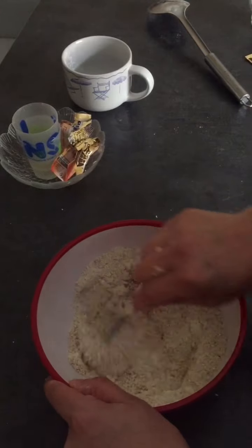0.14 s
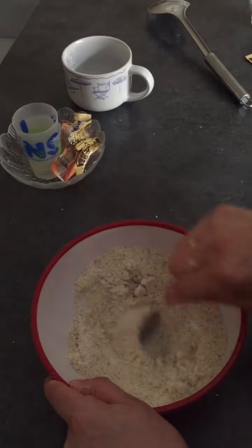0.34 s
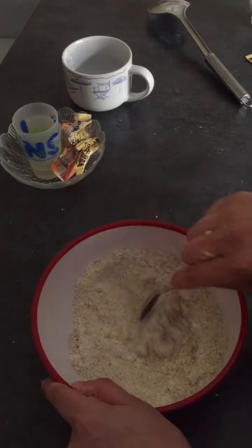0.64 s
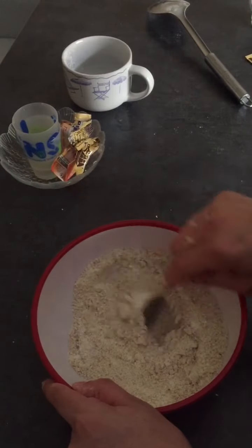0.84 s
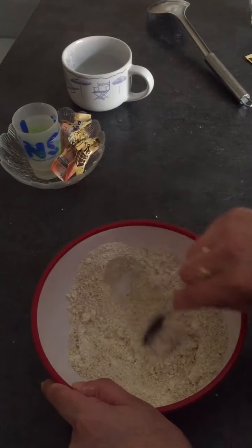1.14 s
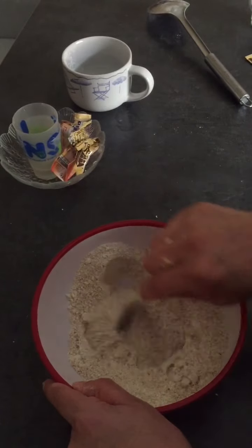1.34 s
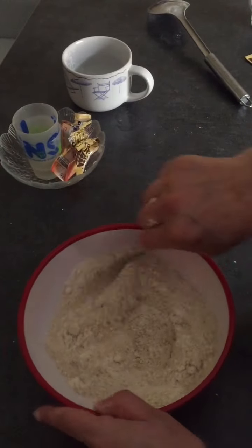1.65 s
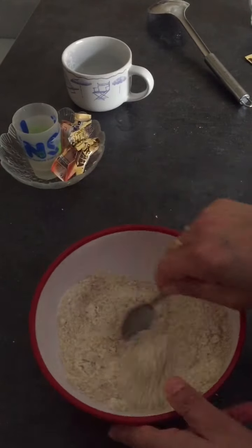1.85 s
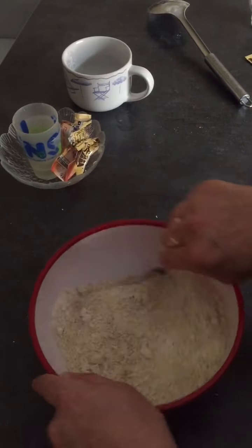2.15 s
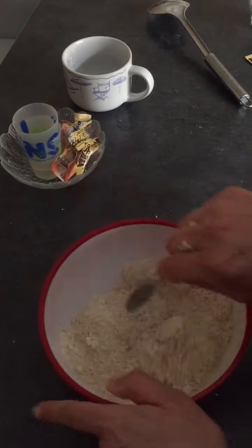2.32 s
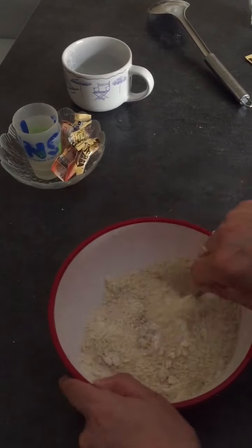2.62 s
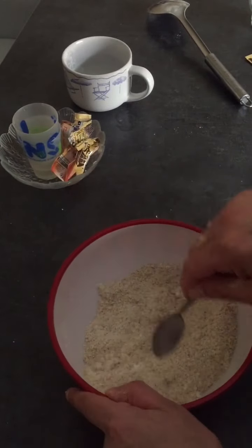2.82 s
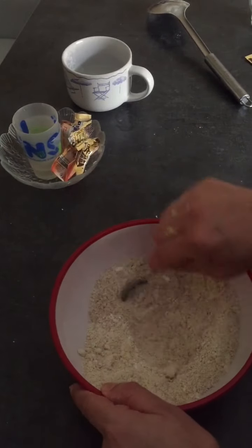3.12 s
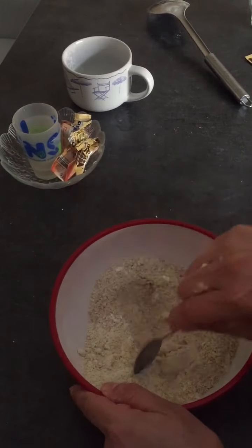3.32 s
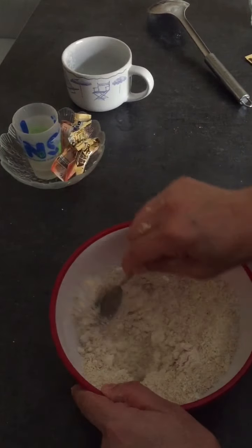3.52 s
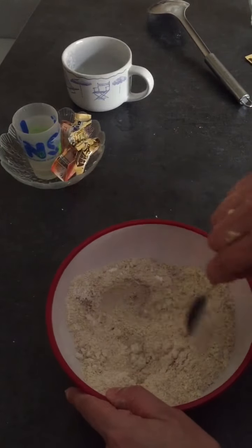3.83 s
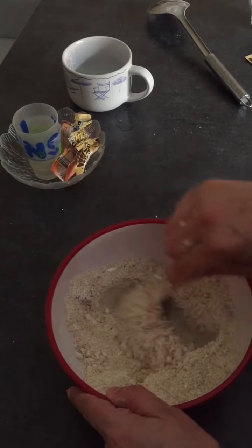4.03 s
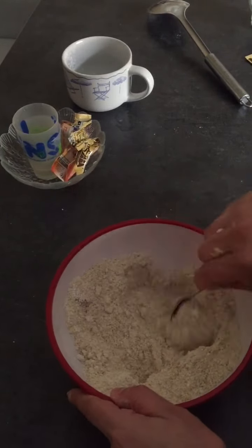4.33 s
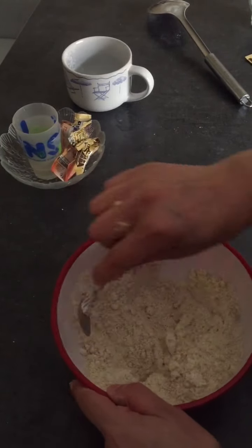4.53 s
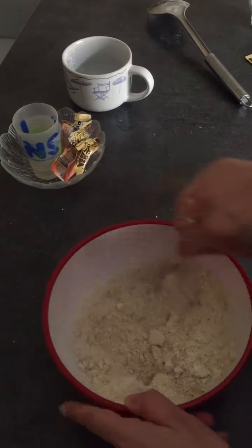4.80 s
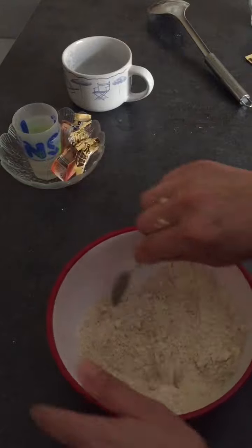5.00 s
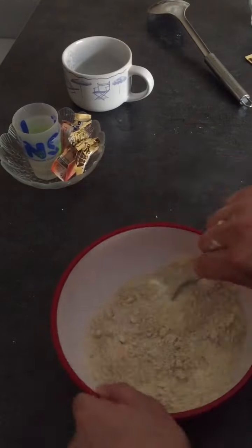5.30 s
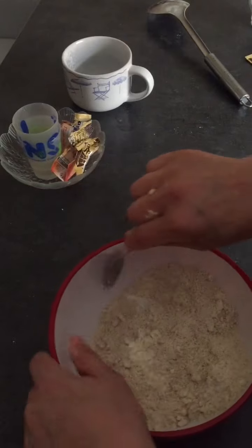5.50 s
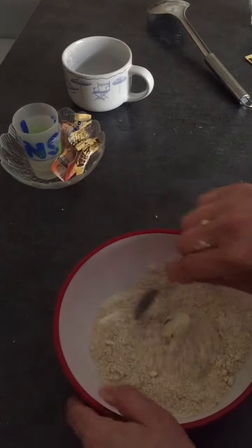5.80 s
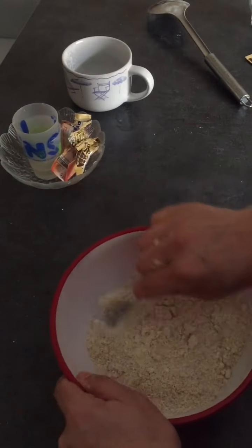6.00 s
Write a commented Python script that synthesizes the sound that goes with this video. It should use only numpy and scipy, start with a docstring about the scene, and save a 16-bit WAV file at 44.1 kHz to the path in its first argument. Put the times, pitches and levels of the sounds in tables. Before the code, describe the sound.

Irregular soft scrapes, crumbly swishes and muted clicks of a steel spoon turning through dry powder in a plastic bowl.

```python
"""A steel spoon stirs a dry, floury mix in a plastic bowl on a kitchen counter, about two turns a second.
In a turn it taps the wall, sweeps crumbs along it, then drags and judders on the bottom; powder damps
every ring. The first turns are light. Near 2.3 s the bowl shudders, a sharp tap follows, and at 3.3 s
a dull knock. The stirring grows busier, and at 5.3 s and 6 s the bowl rocks on the counter.
Throughout, the hard kitchen adds half a second of reverberation over a very quiet noise floor."""
import sys
import numpy as np
from scipy import signal
from scipy.fft import rfft, irfft, next_fast_len
from scipy.io import wavfile
from scipy.ndimage import map_coordinates

SR = 44100
rng = np.random.default_rng(int(sys.argv[2]) if len(sys.argv) > 2 else 0)


def transcribe(u):
    """Save the signal u as a 16-bit wav file named by the first command-line argument.

    u: samples, shape (n,) or (channels, n), limited to [-1, 1]; the rate is SR.
    q: integer samples, one column per channel.
    """
    v = np.clip(np.atleast_2d(u).T, -1, 1)
    q = np.round(v * 32767).astype(np.int16)
    wavfile.write(sys.argv[1], SR, q)


N = 271347

# the spoon lands: t/s, bottom level/dB, wall level/dB, spoon level/dB, edge level/dB,
# second wall mode f/Hz, second spoon mode f/Hz, hardness/(dB per octave)
LANDINGS = [(0.1618, -43.5, -57, -39, -42, 1320, 2250, 3.5),
            (1.1309, -53, -48.5, -45, -52.5, 1305, 3060, -16),
            (1.6153, -47.5, -50.5, -40.5, -44.5, 1320, 2210, -8.5),
            (2.1398, -48.5, -53, -49, -47, 1330, 2660, -2.5),
            (2.5357, -39, -33.5, -23, -21, 1385, 2458, -2.5), (3.2944, -23, -25, -38, -60.5, 1438, 1976, 2),
            (3.534, -47, -51.5, -54, -54, 1335, 3058, -1.5), (4.0736, -39.5, -54, -43, -42, 1244, 2445, -4),
            (4.3364, -49, -37, -41, -42.5, 1150, 2820, 2.5), (4.7224, -58, -76, -44, -45, 1350, 2590, 10),
            (5.2209, -46, -35.5, -32, -33, 1335, 2515, -4),
            (5.6321, -56.5, -37, -31.5, -36.5, 1340, 2560, -5),
            (6.0297, -37.5, -40.5, -25, -24, 1270, 2374, -4)]
# it catches on a lump: t/s, spoon level/dB, edge level/dB, second spoon mode f/Hz
CATCHES = [(0.17, -53, -43.5, 2290), (0.19, -50.5, -51, 2740), (0.643, -68, -71.5, 2500),
           (1.6589, -56, -44, 2540), (1.753, -53, -43, 2800), (1.7836, -45, -38.5, 3250),
           (2.1889, -47, -45.5, 2820), (2.2185, -38, -42.5, 2630), (2.234, -39, -40.5, 3070),
           (2.2614, -42.5, -53, 2970), (2.2713, -39.5, -51, 3230), (2.6516, -41.5, -43.5, 2900),
           (3.3182, -44, -67, 2380), (4.396, -44.5, -55.5, 2830), (4.7373, -42.5, -47.5, 2490),
           (4.7774, -41.5, -47, 2650), (4.856, -51.5, -40.5, 3060), (4.9067, -31, -49, 2526),
           (4.92, -40, -51, 2770), (5.3457, -44, -41.5, 2790), (5.7411, -52, -42.5, 3200),
           (5.7676, -41.5, -36, 2720), (5.776, -40.5, -49, 3110), (6.0843, -35.5, -44, 2590),
           (6.094, -42, -43, 2800)]

def taps():
    """Impact excitation: the spoon lands in the bowl, then catches on lumps as it slides."""
    track = np.zeros(N)
    for s, *blow in LANDINGS:
        add(track, s, contact(*blow))
    for s, spoon_db, edge_db, spoon_hz in CATCHES:
        bottom_db, wall_db = spoon_db - 16.5, spoon_db - 21  # a catch only nudges the bowl
        tick = contact(bottom_db, wall_db, spoon_db, edge_db, WALL_MODES[1][0], spoon_hz, hardness_db=.5)
        add(track, s, tick)
    return track


# modes of bowl and spoon, damped by powder and hand: f/Hz, bandwidth/Hz, relative level/dB
BOTTOM_MODES = [(520, 300, -10), (742, 230, 0), (823, 120, -2)]
WALL_MODES = [(1190, 170, 1.5), (1406, 170, 2), (1625, 260, -4.5)]
SPOON_MODES = [(1922, 370, 1.5), (2514, 180, 5), (2716, 220, 7), (3510, 380, 2.5)]
EDGE_MODES = [(4010, 270, -4.5), (4480, 540, -0.5), (5277, 200, -5.5), (5860, 400, -0.5), (6760, 1700, 1.5),
              (8414, 350, -7), (9335, 350, -8.5), (10840, 410, -9.5), (12400, 590, -1), (14070, 2700, 0.5)]

def contact(bottom_db, wall_db, spoon_db, edge_db, wall_hz, spoon_hz, hardness_db):
    """Damped free vibration: after one blow, bowl and spoon ring for a few milliseconds."""
    damping = 1 + amp(bottom_db + 28)  # a heavy blow buries the spoon in powder, deadening the bowl
    bottom = amp(bottom_db) * ring(BOTTOM_MODES, damping=damping)
    wall = amp(wall_db) * ring(WALL_MODES, pitch=wall_hz / WALL_MODES[1][0], damping=damping)
    # grip and point of contact shift the spoon's ring; bare steel on the wall is brighter
    spoon = amp(spoon_db) * ring(SPOON_MODES, pitch=spoon_hz / SPOON_MODES[1][0])
    edge = amp(edge_db) * ring(EDGE_MODES, tilt_db=hardness_db)
    return np.sqrt(SR / 200) * (bottom + wall + spoon + edge)  # levels refer to energy spread over 5 ms


def ring(modes, pitch=1, tilt_db=0, damping=1, spread_db=1.2, detune=.012):
    """Modal superposition: damped sines of unit total energy that vary with the point of contact."""
    hz, width, db = np.transpose(modes)[:, :, None]
    t = np.arange(SR // 20) / SR
    strength, shift = rng.standard_normal((2, len(modes), 1))
    polarity = (-1) ** np.arange(len(modes))[:, None]
    gain = amp(db + spread_db * strength + tilt_db * np.log2(hz / hz[0]))
    waves = np.sin(2 * np.pi * hz * pitch * (1 + detune * shift) * t)
    decay = np.exp(-np.pi * width * damping * t)
    sound = np.sum(polarity * gain * waves * decay, axis=0)
    # the body radiates little outside the range of its modes
    band = [.78 * hz.min() * pitch, min(1.22 * hz.max() * pitch, .45 * SR)]
    sound = signal.sosfilt(signal.butter(2, band, "bandpass", fs=SR, output="sos"), sound)
    return sound / np.linalg.norm(sound)


# spectral shape of crushed grit: f/Hz, relative level/dB
GRIT_SPECTRUM = [(600, -35), (1300, -9.5), (1700, -17), (3000, -9.5), (4100, -2.5), (4800, -12.5),
                 (5600, -4.5), (7200, -2.5), (8600, -4.5), (10200, -10), (11600, -7), (12800, -4),
                 (14000, -10), (16000, -17.5)]
# modes of the bowl under a dragging spoon: f/Hz, bandwidth/Hz, relative level/dB
JUDDER_MODES = [(254.8, 53, -15), (364, 65, -13), (557.7, 89, -8.5), (641, 106, 0.5), (717.3, 190, 1.5),
                (921, 140, -6), (1349, 320, -7.5)]

def stirring():
    """Friction noise: crumbs crack, rasp on the spoon's edge and make it sing; the bowl judders."""
    judder, scrape, grit = strokes()
    clumps = amp(3.3 * wobble(130))
    powder = amp(-11.5) * rng.standard_normal(N)
    crunch = unit(clumps * coloured(crumbs() + powder, GRIT_SPECTRUM))
    edge_slips = clumps * slips(rate=810, spread_db=1.5, smooth_db=-15.5)
    rasp = rubbed(edge_slips, EDGE_MODES, spread_db=5.5, detune=.029)
    spoon_slips = clumps * slips(rate=1400, spread_db=7, smooth_db=-19)
    steel = rubbed(spoon_slips, SPOON_MODES, spread_db=2.5, detune=.052)
    bowl_slips = slips(rate=400, spread_db=2.5, smooth_db=-15)
    bowl = rubbed(bowl_slips, JUDDER_MODES, spread_db=3.3, detune=.0089)
    crushing = amp(3.5) * crunch + amp(-5.5) * rasp
    return grit * crushing + amp(.5) * scrape * steel + amp(5) * judder * bowl


# sweeps along the wall, crumbs piling up ahead:
# t/s, duration/s, final relative grit level/dB, grit swell/dB, relative scrape level/dB
SWEEPS = [(0, 0.041, -77, 19.5, -62.5), (0.152, 0.049, -66, -11, -53.5), (1.12, 0.024, -58, -1, -59.5),
          (1.611, .18, -47, 13, -54), (2.124, 0.13, -48.5, 18.5, -56.5), (2.522, 0.16, -56, 8.5, -49.5),
          (3.522, .03, -70, 2.5, -57.5), (4.063, 0.031, -57.5, 0.5, -50), (4.348, 0.053, -60, 10.5, -56.5),
          (4.71, 0.2, -47.5, 9.5, -59), (5.231, 0.12, -48.5, 17, -48.5), (5.646, 0.14, -45.5, 22, -59),
          (6.02, 0.088, -67, -4, -51)]
# drags over the bottom:
# firmest t/s, relative judder level/dB, pressing time constant/s, easing time constant/s
DRAGS = [(0.02, -63, 0.09, 0.023), (1.905, -52.5, 0.17, 0.045), (2.29, -43, 0.022, .065),
         (2.66, -60, .02, 0.078), (4.96, -48.5, 0.076, 0.052), (5.255, -51.5, 0.031, 0.11),
         (5.459, -47.5, 0.039, 0.078), (5.796, -48, 0.079, 0.056)]

def strokes(attack_s=.012, release_s=.0055):
    """Amplitude envelopes: judder, scrape and grit follow the strokes; coupled parts add in power."""
    t = np.arange(N) / SR
    judder, scrape, grit = np.zeros((3, N))
    for start, length, grit_db, swell_db, scrape_db in SWEEPS:
        release = np.exp(-np.maximum(t - start - length, 0) / release_s)
        touch = np.clip((t - start) / attack_s, 0, 1) * release
        still_to_go = np.clip(1 - (t - start) / length, 0, 1)
        grit += touch * amp(grit_db - swell_db * still_to_go)
        scrape += touch * amp(scrape_db)
    for firmest, db, press_s, ease_s in DRAGS:
        since = t - firmest
        judder += amp(db) * np.exp(-np.where(since < 0, (since / press_s) ** 2, since / ease_s))
    return (np.hypot(judder, amp(-9.5) * scrape),  # a sweep also shakes the bowl
            np.hypot(scrape, amp(-7) * judder),  # a drag also makes the spoon sing
            np.hypot(grit, amp(-18.5) * judder))  # and crushes a little grit


def crumbs(count=12000, centre_hz=7400, decay_cycles=1.8):
    """Brittle fracture: each crumb breaks with a tick of its own pitch and size."""
    start = rng.integers(N, size=(count, 1))
    hz = np.clip(centre_hz * np.exp(.5 * rng.standard_normal((count, 1))), 2000, 14500)
    size = amp(1.5 * np.minimum(rng.exponential(size=(count, 1)), 3))
    step = np.arange(SR // 300)
    cycles = hz * step / SR
    ticks = size * np.sin(2 * np.pi * cycles) * np.exp(-cycles / decay_cycles)
    return unit(np.bincount((start + step).ravel(), ticks.ravel(), N)[:N])


def slips(rate, spread_db, smooth_db):
    """Stick-slip friction: random uneven kicks, rate a second, over the smooth rub of fine powder."""
    happens = rng.random(N) < rate / SR
    size = amp(spread_db * np.minimum(rng.exponential(size=N), 3))
    kicks = happens * size * rng.choice([-1, 1], N)
    return unit(unit(kicks) + amp(smooth_db) * rng.standard_normal(N))


def rubbed(kicks, modes, spread_db, detune, stay_s=.07):
    """Forced vibration: kicks drive a body whose response changes as the point of contact moves on."""
    track, block = np.zeros(N), round(stay_s * SR)
    for start in range(0, N, block):
        response = ring(modes, spread_db=spread_db, detune=detune)
        add(track, start / SR, signal.fftconvolve(kicks[start:start + block], response))
    return unit(track)


# short low swings of the bowl, shudders under the spoon and the low thud of the knock at 3.3 s:
# t/s, peak level/dB, f/Hz
BOWL_SWINGS = [(2.278, -30, 864), (2.282, -32.5, 673), (2.297, -27, 710.5), (2.323, -29.5, 653),
               (3.297, -35.5, 331), (4.084, -36.5, 776), (4.955, -34.5, 780), (5.035, -36, 733),
               (5.448, -32.5, 706)]

def bowl_swings(rise_s=.0027):
    """Heavily damped transient: cushioned by powder, the bowl's bottom swings for only a few cycles."""
    track, t = np.zeros(N), np.arange(SR // 25) / SR
    swell = (t / rise_s * np.exp(1 - t / rise_s)) ** 2
    for s, db, hz in BOWL_SWINGS:
        add(track, s, amp(db) * swell * np.sin(2 * np.pi * hz * t))
    return track


# the held bowl rocks: t/s, level before the envelope/dB
BUMPS = [(5.279, -46.5), (6.04, -42.5)]

def bumps(hz=60, t60_s=.14, attack_s=.012):
    """Damped oscillator: the bowl settles on the counter with a soft low thud."""
    track, t = np.zeros(N), np.arange(SR // 3) / SR
    envelope = (1 - np.exp(-t / attack_s)) ** 2 * np.exp(-np.log(1000) * t / t60_s)
    for s, db in BUMPS:
        add(track, s, amp(db) * envelope * np.sin(2 * np.pi * hz * t))
    return track


# reverberation time: f/Hz, T60/s
KITCHEN_T60 = [(200, 0.88), (700, 0.5), (2600, 0.5536), (5000, .56), (9000, .5), (15000, 0.32)]
# reverberation against direct sound: f/Hz, level/dB
REVERB_SPECTRUM = [(200, -9.5), (250, -2.5), (700, -4), (1300, -4), (2600, -3), (6000, -8.5),
                   (14000, -12.5)]

def kitchen(x, first_wall_s=.005, early_s=.02):
    """Diffuse reverberation: an exponential tail whose pattern changes as spoon and bowl move."""
    wet, block = np.zeros(N), SR // 3
    for start in range(0, N, block):
        hz, t, noise = signal.stft(rng.standard_normal(SR * 3 // 4), SR, nperseg=256)
        early = 1 + .45 * np.exp(-t / early_s)  # reflections from counter and near walls
        decay = early * np.exp(-np.log(1000) * t / along(KITCHEN_T60, hz)[:, None])
        decay /= np.sqrt(np.sum(decay ** 2, axis=1, keepdims=True) * t[1] * SR)  # unit energy per band
        gain = amp(along(REVERB_SPECTRUM, hz))[:, None]
        tail = signal.istft(noise * decay * gain, SR, nperseg=256)[1]
        add(wet, start / SR + first_wall_s, signal.fftconvolve(x[start:start + block], tail))
    return wet


# spectral density of the background: f/Hz, relative level/dB
FLOOR_SPECTRUM = [(15, -62), (25, -30.5), (45, -13.5), (102, -5), (161, -7.5), (190, -8), (256, -9.5),
                  (301, -11.5), (451, -15), (936, -20.5), (1650, -19.5), (2610, -25), (3430, -24),
                  (16000, -37)]

def room_floor(level_db=-69.5):
    """Broadband ambient noise: faint rumble of the house and microphone hiss."""
    return amp(level_db + .36 * wobble(6)) * unit(coloured(rng.standard_normal(N), FLOOR_SPECTRUM))


def amp(db):
    """Decibel law: level to amplitude ratio."""
    return 10 ** (np.asarray(db) / 20)


def unit(x):
    """Normalisation to rms 1."""
    return x / np.sqrt(np.mean(x ** 2) + 1e-20)


def along(points, hz):
    """Interpolation of (f/Hz, value) points on a log frequency axis."""
    f, v = np.transpose(points)
    return np.interp(np.log(hz + 1), np.log(f + 1), v)


def wobble(rate):
    """Random modulation: a smooth curve with rate knots a second."""
    knots = rng.standard_normal(int(N * rate / SR) + 4)
    return map_coordinates(knots, [np.arange(N) * rate / SR])


def filtered(x, response):
    """Linear filtering: the spectrum of x times a frequency response."""
    size = next_fast_len(len(x) + 8192)
    return irfft(rfft(x, size) * response(np.fft.rfftfreq(size, 1 / SR)), size)[:len(x)]


def coloured(x, spectrum):
    """Spectral shaping by (f/Hz, level/dB) points."""
    return filtered(x, lambda hz: amp(along(spectrum, hz)))


def add(track, s, sound):
    """Superposition: a sound joins the track at s seconds."""
    start = round(s * SR)
    part = track[start:start + len(sound)]
    part += sound[:len(part)]


def scene():
    """Direct plus reverberant field: spoon and bowl, close up, in the kitchen."""
    spoon = taps() + bowl_swings() + stirring()
    return (spoon + kitchen(spoon) + bumps() + room_floor())[None]


def record(dry, top_hz=16200):
    """Band limiting: the microphone acts as a steep low-pass filter."""
    return np.array([filtered(channel, lambda hz: 1 / (1 + (hz / top_hz) ** 120)) for channel in dry])


dry = scene()
out = record(dry)
transcribe(out)
```